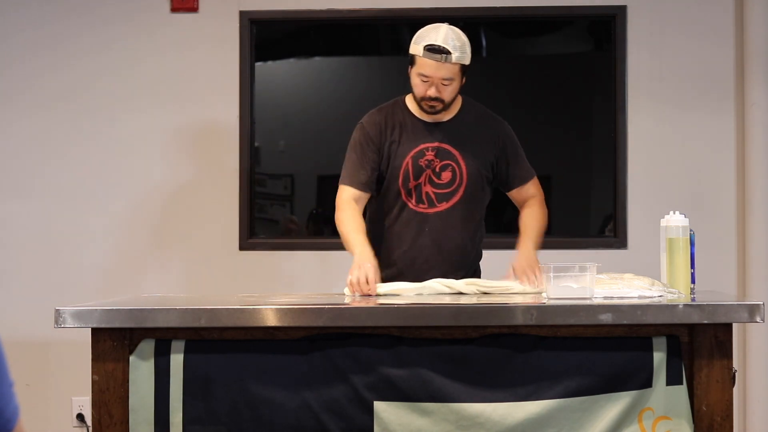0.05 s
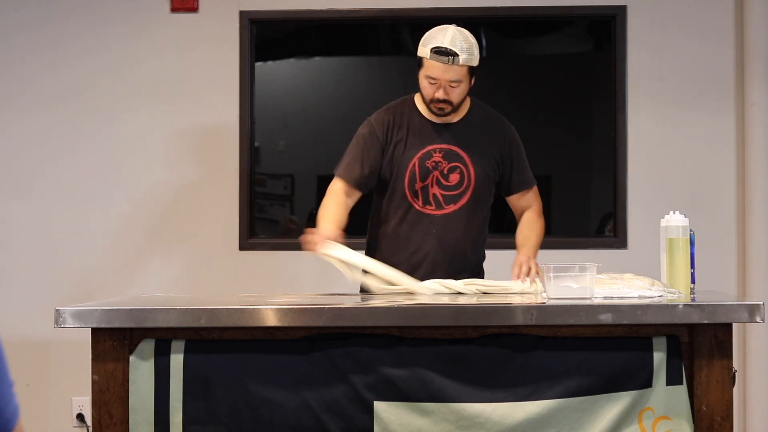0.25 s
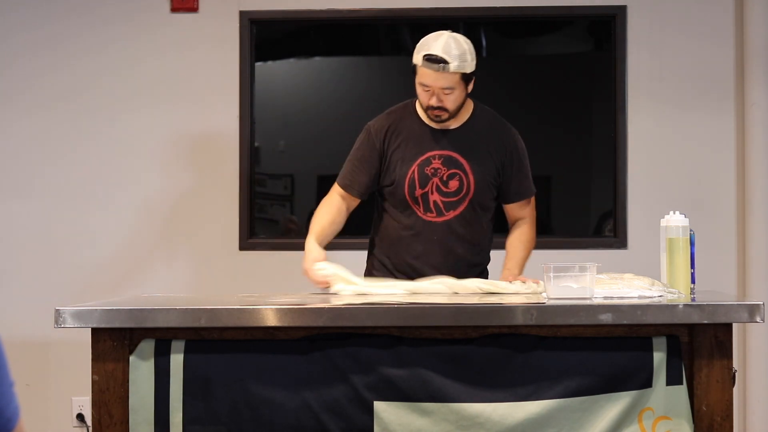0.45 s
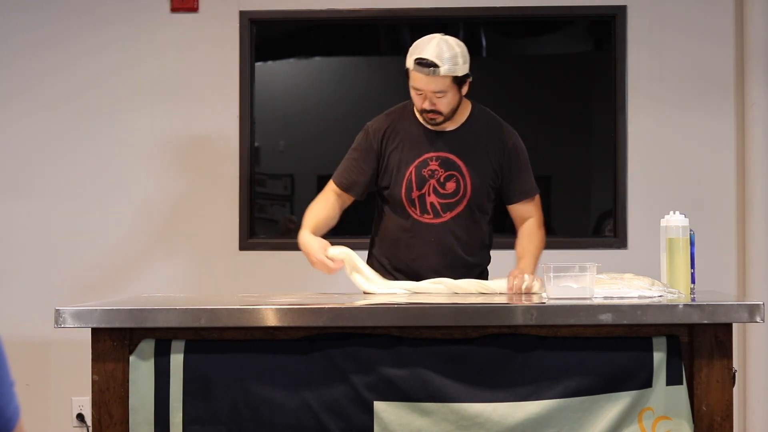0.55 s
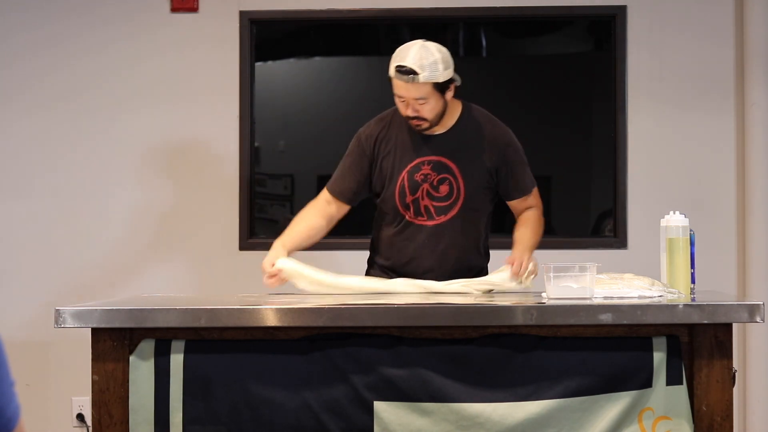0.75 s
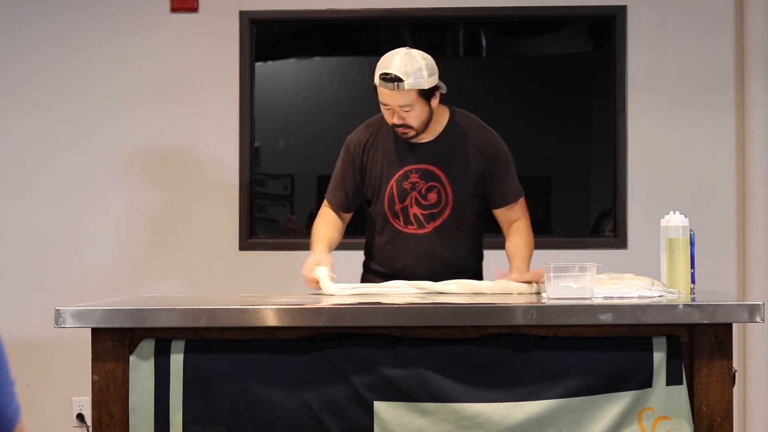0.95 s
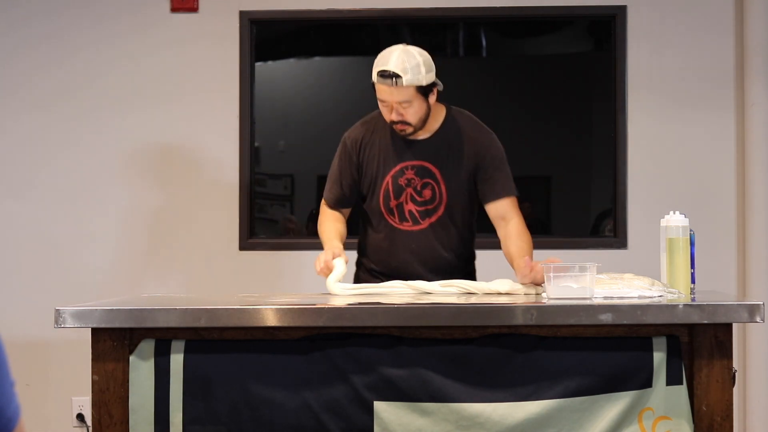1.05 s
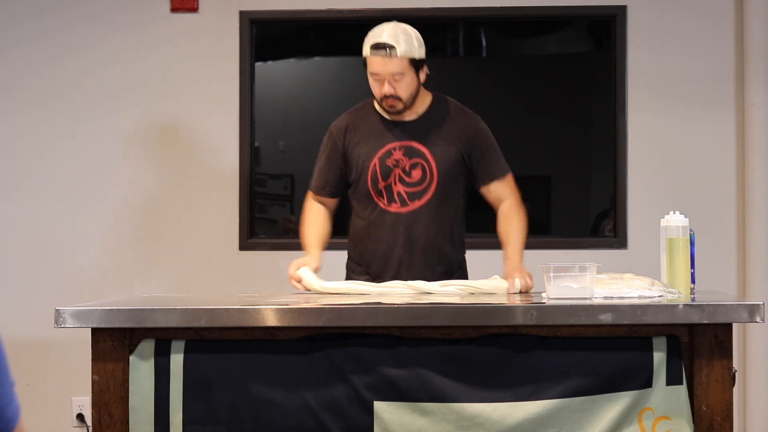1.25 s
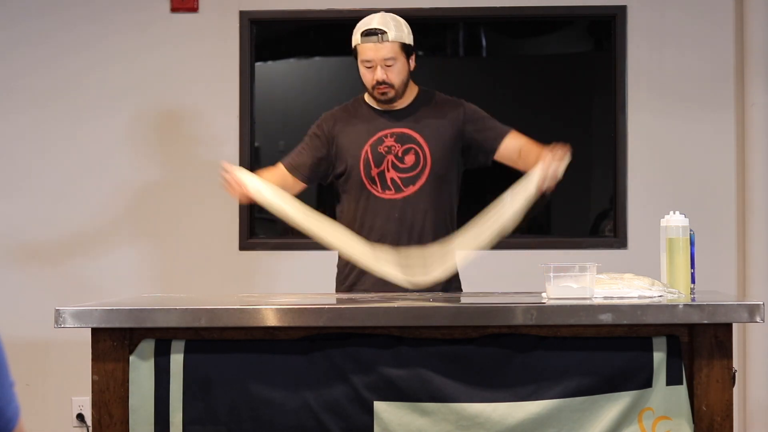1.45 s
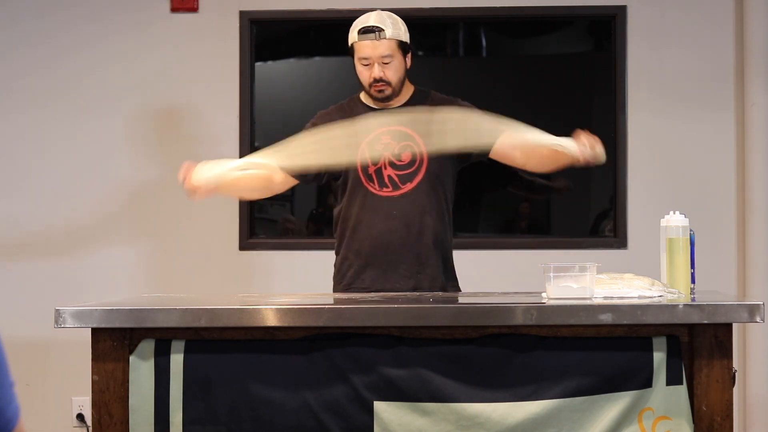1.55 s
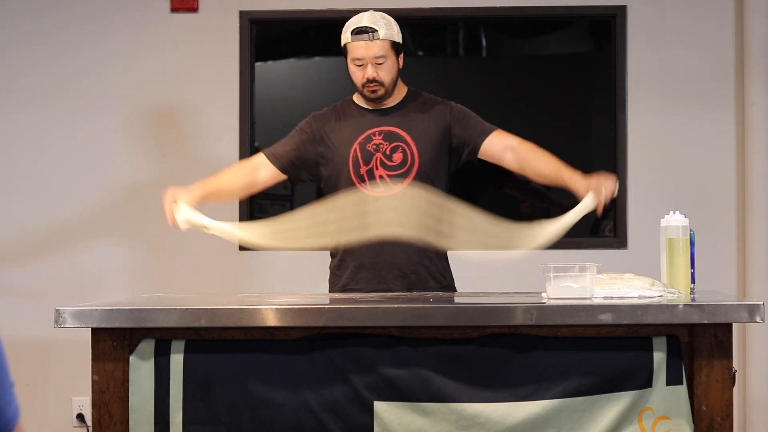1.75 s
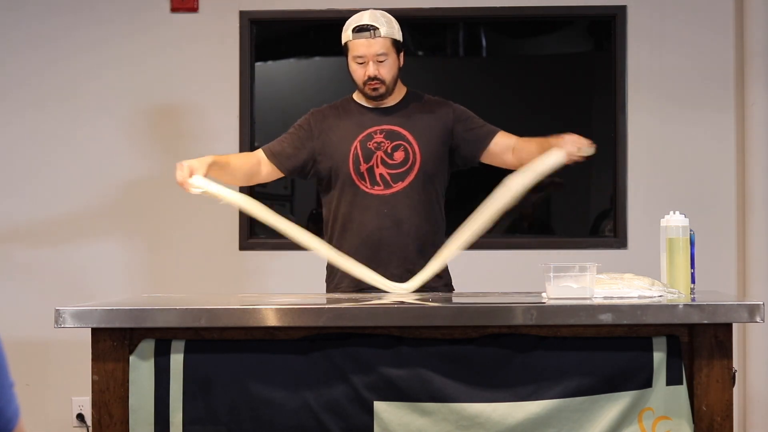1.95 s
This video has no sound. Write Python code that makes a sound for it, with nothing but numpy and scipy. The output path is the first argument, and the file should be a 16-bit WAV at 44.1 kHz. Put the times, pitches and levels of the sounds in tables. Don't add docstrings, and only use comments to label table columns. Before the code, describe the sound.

Noodle dough rope slapped on a steel-topped table: soft knocks first, then one sharp ringing crack.

```python
import sys
import numpy as np
from scipy import signal
from scipy.io import wavfile

SR = 44100
rng = np.random.default_rng(int(sys.argv[2]) if len(sys.argv) > 2 else 0)


def amplitude_ratio(level_db):
    exponent = np.asarray(level_db, float) / 20
    return 10 ** exponent


def generate_wav(signal):
    frames = np.transpose(np.atleast_2d(signal))
    scaled = np.clip(frames, -1, 1) * 32767
    pcm = np.round(scaled).astype(np.int16)
    wavfile.write(sys.argv[1], SR, pcm)


N = 88200

# f/Hz, level/dB per Hz, t60/s
WASH = [(50.6, -5.5, 1), (140, 1.5, 0.69), (410, -6, 0.92), (965, -3.5, 0.32), (1910, -9.5, 0.27),
        (4600, -23.5, 0.31), (5900, -36, 0.44), (15000, -53, 0.31)]


def unit_rms(x):
    return x / np.sqrt(np.mean(x ** 2) + 1e-20)


def at_hz(rows, hz, column=1):
    return np.interp(np.log(hz), np.log(np.array(rows)[:, 0]), np.array(rows)[:, column])


def drift(rate_per_s):
    pole = np.exp(-80 * np.pi * rate_per_s / SR)
    white = rng.standard_normal(N // 40 + 2002)
    slow = signal.lfilter([1], [1, -2 * pole, pole * pole], white)[2000:]
    return np.interp(np.arange(N) / 40, np.arange(len(slow)), unit_rms(slow))


def ring(x, hz, t60_s):
    pole = amplitude_ratio(-60 / (max(t60_s, .003) * SR))
    turn_rad = 2 * np.pi * hz / SR
    return signal.lfilter([0, np.sin(turn_rad)], [1, -2 * pole * np.cos(turn_rad), pole * pole], x + 1e-18)


def sung(hz, width_hz):
    return unit_rms(ring(rng.standard_normal(N + SR), hz, 2.2 / width_hz)[SR:])


def strike(start_s, rise_s, t60_s):
    out, start = np.zeros(N), int(start_s * SR)
    t = np.arange(min(N - start, int(t60_s * SR * 1.5))) / SR
    rise = 1 - np.exp(-t / max(rise_s, 1e-4))
    out[start:start + len(t)] = rise * amplitude_ratio(-60 * t / t60_s)
    return out


def click_at(time_s, height=1.0):
    out = np.zeros(N)
    out[int(time_s * SR)] = height
    return out


def soft(clicks, cut_hz):
    return signal.lfilter(*signal.butter(2, cut_hz, fs=SR), clicks)


def bandpass(x, low_hz, high_hz):
    return signal.sosfilt(signal.butter(2, [low_hz, high_hz], "band", fs=SR, output="sos"), x)


def bands():
    edges_hz = 22 * 2 ** np.arange(0, 9.7, 1 / 3)
    white = rng.standard_normal((2, N + 8000))
    bank = []
    for k, (low, high) in enumerate(zip(edges_hz, edges_hz[1:])):
        bank.append((np.sqrt(low * high), bandpass(white[k % 2], low, high)[8000:]))
    return bank


def wash_rms(bank):
    return np.std(sum(amplitude_ratio(at_hz(WASH, hz)) * noise for hz, noise in bank))


def crack():
    # f/Hz, level/dB, t60/s
    air_modes = [(2230, -12.5, 0.02), (2820, -8, .008), (3580, -4, 0.011), (4600, -8.5, 0.015),
                 (8200, -21, 0.0039), (12000, -35, 0.0032)]
    click = click_at(1.9174)
    return sum(amplitude_ratio(db) * ring(click, hz, t60) * (-1) ** k for k, (hz, db, t60) in enumerate(air_modes))


def landing():
    # t/s, strength/dB, contact cut f/Hz
    hits = [
        (1.9094, -28, 900),
        (1.9119, -19.5, 253),
        (1.9176, -7, 444),
        (1.9248, -5.5, 2500),
        (1.9321, -7.5, 1360),
        (1.9374, -12, 2580),
        (1.9526, -19, 1500),
        (1.966, -19, 1480),
    ]
    # f/Hz, level/dB, t60/s
    sheet = [(157.3, -12, 0.13), (301, -13.5, 0.085), (380.6, -15.5, 0.19), (482, -16, 0.095),
             (729, -16, 0.16), (850, -17, 0.14), (954, -6, 0.069), (1072, -7, 0.092), (1200, -24, 0.043),
             (1310, -10.5, 0.072), (1562, -7, 0.14), (1654, -13, 0.12), (1694, -9.5, 0.06),
             (2025, -15.5, 0.11)]
    spread_db = 1.5 * rng.normal(0, 1, (len(hits), len(sheet)))
    out = np.zeros(N)
    for (s, hit_db, cut_hz), offsets_db in zip(hits, spread_db):
        push = soft(click_at(s, amplitude_ratio(hit_db)), cut_hz)
        for (hz, db, t60), offset_db in zip(sheet, offsets_db):
            out += amplitude_ratio(db + offset_db) * ring(push, hz, t60)
    return out


def slap_wash(bank):
    flutter_db = 1 * drift(67)
    out = np.zeros(N)
    for hz, noise in bank:
        level = amplitude_ratio(at_hz(WASH, hz) + flutter_db * min(hz / 4000, 1.5))
        out += level * noise * strike(1.9174, 0.0037, at_hz(WASH, hz, column=2))
    return amplitude_ratio(-11) / wash_rms(bank) * out


def swish():
    # f/Hz, width/Hz, level/dB, delay/s
    eddies = [(2020, 280, -51, .001), (593, 35, -36, 0.0079), (3800, 2000, -65, .001),
              (8100, 2500, -68, 0.005)]
    return sum(amplitude_ratio(db) * sung(hz, width) * strike(1.879 + delay, 0.0068, 1.0)
               for hz, width, db, delay in eddies)


def knocks(bank):
    # t/s, thud level/dB, body level/dB, t60 scale
    blows = [
        (0.001, -36, -37, 0.5),
        (0.156, -20.5, -30.5, 0.69),
        (0.565, -34.5, -47, 0.65),
        (0.912, -44, -46, 0.84),
        (1.275, -34.5, -60, 0.53),
    ]
    # f/Hz, level/dB, t60/s
    frame_modes = [(76, -61, .15), (161.3, 2, 0.17), (290, -12, 0.089), (435, -8, 0.075)]
    cut_hz, rise_s, thud_delay_s = 1140, 0.0011, 0.00413
    out, norm = np.zeros(N), wash_rms(bank)
    for s, thud_db, body_db, scale in blows:
        push = soft(click_at(s + thud_delay_s, amplitude_ratio(thud_db)), 590.0)
        out += sum(amplitude_ratio(db) * ring(push, hz, t60 * scale) for hz, db, t60 in frame_modes)
        for hz, noise in bank:
            level = amplitude_ratio(body_db) / norm * amplitude_ratio(at_hz(WASH, hz)) / np.hypot(1, (hz / cut_hz) ** 2)
            out += level * noise * strike(s, rise_s, scale * at_hz(WASH, hz, column=2))
    return out


def ticks():
    # t/s, level/dB, centre f/Hz, t60/s
    puffs = [(0.001, -44, 2500, .2), (0.001, -48.5, 4600, 0.1), (0.001, -51.5, 10400, 0.034),
             (0.155, -46, 4640, 0.075), (0.157, -52.5, 9300, .03), (0.153, -34.5, 1280, 0.033),
             (0.440, -63, 4500, 0.04), (0.455, -61, 9500, 0.013), (0.465, -65, 7500, 0.014),
             (0.518, -68, 6800, 0.034), (0.556, -51, 4160, 0.053), (0.563, -47.5, 3800, 0.049),
             (0.555, -58, 10100, .03), (0.562, -66, 9900, .04), (0.562, -46.5, 1950, 0.13),
             (0.644, -54, 3480, 0.038), (0.650, -56.5, 4300, 0.064), (0.906, -50, 770, 0.23),
             (0.943, -56, 4170, 0.084), (1.31, -53, 4400, 0.1), (1.313, -59, 8300, 0.046),
             (1.9083, -27.5, 3470, 0.023), (1.9083, -35, 1200, 0.12), (1.9092, -41.5, 9000, 0.022),
             (1.9178, -9, 3500, 0.022), (1.9171, -19.5, 8700, 0.017), (1.925, -31.5, 6400, .03),
             (1.942, -53, 12000, .02)]
    white = rng.standard_normal(N)
    out = np.zeros(N)
    for s, db, hz, t60 in puffs:
        out += amplitude_ratio(db) * strike(s, 0.00017, t60) * unit_rms(bandpass(white, hz * 0.63, hz * 1.27))
    return out


def squeaks():
    # t/s, f/Hz, width/Hz, level/dB, t60/s
    slides = [(0.37, 12800, 700, -76, .8), (0.92, 6900, 150, -72, .5), (0.92, 7800, 150, -73, .5),
              (0.93, 5900, 150, -73, .4), (0.93, 8800, 200, -76, .4), (0.75, 7500, 80, -83, 6.0),
              (1.302, 9000, 500, -62, .12), (0.43, 4500, 350, -60, .12)]
    return sum(amplitude_ratio(db) * sung(hz, width) * strike(s, 0.014, t60) for s, hz, width, db, t60 in slides)


def hall():
    # t/s, level/dB
    rumble_level = [(0.0, -39), (0.108, -37.5), (0.644, -39), (0.91, -42), (1.372, -40), (1.712, -43),
                    (1.88, -40.5)]
    # f/Hz, level/dB per Hz
    rumble_colour = [(15, -36), (25, -18.5), (48, -7.5), (124, 2), (227, -9), (267, -1), (311, -7),
                     (500, -21.5), (650, -50), (1100, -120)]
    # f/Hz, level/dB per Hz
    hiss_colour = [(300, -14), (600, 1), (1200, -4.5), (2400, -13), (4600, -18.5), (5800, -28.5),
                   (10000, -32.5), (16000, -37)]
    # f/Hz, width/Hz, level/dB
    duct_modes = [(60.5, 3.4, -48.5), (114.2, 6.6, -60), (259.8, 14, -56.5)]
    level = amplitude_ratio(np.interp(np.arange(N) / SR, *np.transpose(rumble_level)))
    rumble, hiss = np.zeros(N), np.zeros(N)
    for hz, noise in bands():
        if hz < 600:
            rumble += amplitude_ratio(at_hz(rumble_colour, hz) + 1.2 * drift(4.3)) * noise
        if hz > 350:
            hiss += amplitude_ratio(at_hz(hiss_colour, hz) + 0.24 * drift(24.0)) * noise
    ducts = sum(amplitude_ratio(db + 40.5) * sung(hz, width) for hz, width, db in duct_modes)
    hiss_level = amplitude_ratio(-54) * level ** 0.32 / np.mean(level ** .3)
    return level * (amplitude_ratio(-1.0) * unit_rms(rumble) + ducts) + hiss_level * unit_rms(hiss)


def scene():
    bank = bands()
    slap = crack() + landing() + slap_wash(bank)
    return (slap + swish() + knocks(bank) + ticks() + squeaks() + hall())[None]


def roll_off(x):
    return signal.sosfilt(signal.butter(12, 15900, fs=SR, output="sos"), x)


def record(dry):
    thin = signal.sosfilt(signal.butter(3, 41, "high", fs=SR, output="sos"), dry)
    return roll_off(1.373 * np.tanh(thin / 1.335))


dry = scene()
out = record(dry)
generate_wav(out)
```